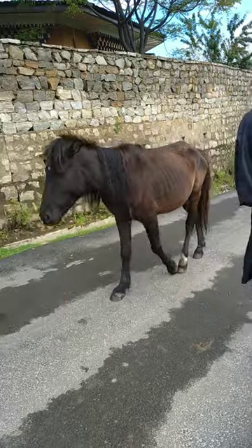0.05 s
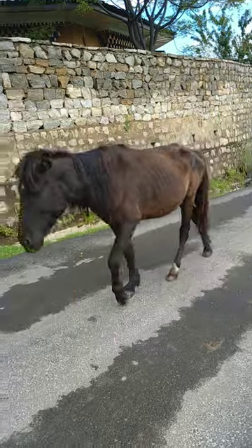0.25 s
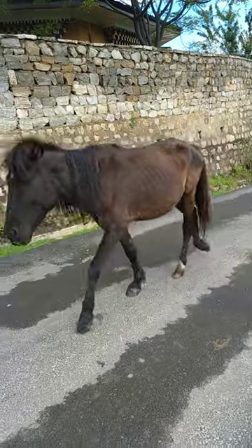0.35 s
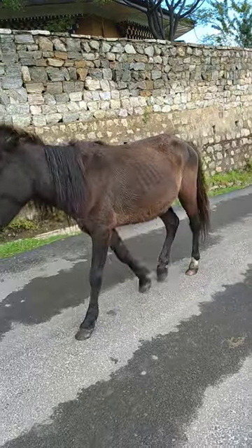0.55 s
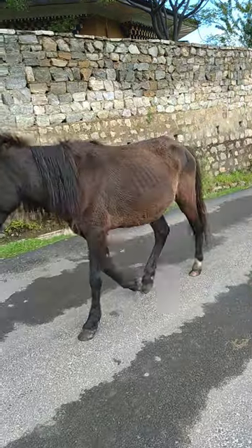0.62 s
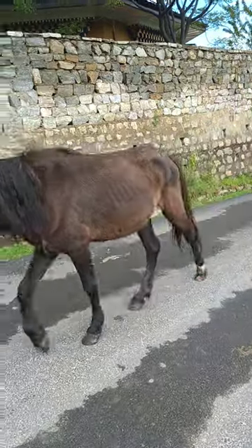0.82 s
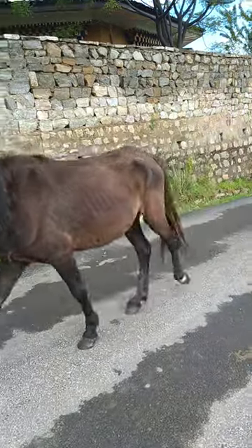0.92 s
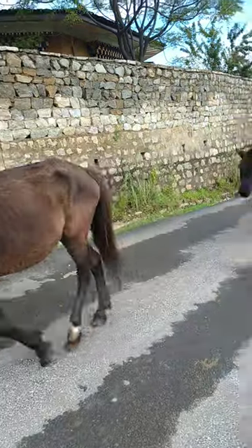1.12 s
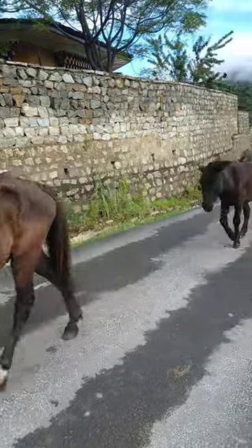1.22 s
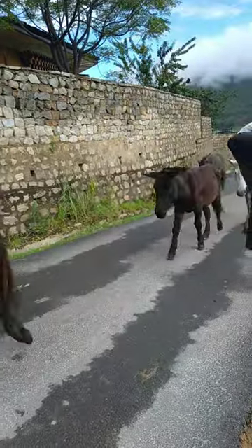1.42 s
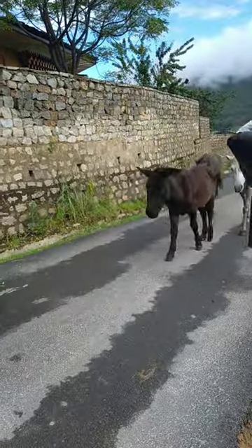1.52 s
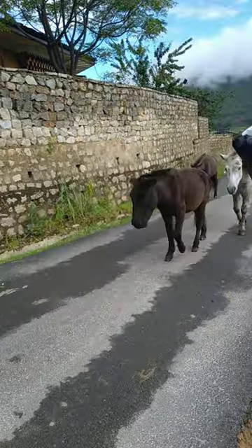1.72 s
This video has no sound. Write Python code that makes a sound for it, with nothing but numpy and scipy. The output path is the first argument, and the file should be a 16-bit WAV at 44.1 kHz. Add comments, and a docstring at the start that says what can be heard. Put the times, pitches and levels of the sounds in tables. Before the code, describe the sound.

Horse hooves clop dully on a paved road over a steady hiss of cicadas.

```python
"""A hissing cicada chorus fades in, with a far engine idling under a faint outdoor rumble.
One nearer insect pulses and dies away. Unshod horses walk past on a paved road beside a stone wall:
dull clops, a few scuffs on grit, a short echo. Later one cicada swells on the left.
The fade is the recorder's gain rising as it starts; its right channel gives one electrical pop."""
import sys
import numpy as np
from scipy import signal
from scipy.fft import rfft, irfft, next_fast_len
from scipy.io import wavfile
from scipy.ndimage import map_coordinates

SR = 44100
rng = np.random.default_rng(int(sys.argv[2]) if len(sys.argv) > 2 else 0)


def master(y):
    """Save y as 16-bit WAV."""
    cut = np.clip(np.atleast_2d(y).T, -1, 1)
    pcm = np.round(cut * 32767)  # scale
    wavfile.write(sys.argv[1], SR, pcm.astype(np.int16))


N = 77175
TIME_S = np.arange(N) / SR


def amp(db):
    """Decibels to gain."""
    return 10 ** (np.asarray(db) / 20)


def unit(x):
    """Scale to rms 1."""
    return x / np.sqrt(np.mean(x ** 2) + 1e-20)


def along(points, hz):
    """Interpolate (frequency [Hz], value) points on a log axis."""
    f, v = np.transpose(points)
    return np.interp(np.log(hz + 1), np.log(f + 1), v)


def level(points):
    """Gain per sample from (time [s], level [dB]) points."""
    return amp(np.interp(TIME_S, *np.transpose(points)))


def pan(db):
    """Stereo gains; positive dB is left."""
    return amp(np.array([[.5], [-.5]]) * db)


def bell(offset, width):
    """Gaussian of peak 1."""
    return np.exp(-.5 * (offset / width) ** 2)


def wobble(rate_hz):
    """Smooth random curve, rate_hz knots a second."""
    return map_coordinates(rng.standard_normal(int(N * rate_hz / SR) + 4), [TIME_S * rate_hz])


def filtered(x, response):
    """Apply a frequency response."""
    size = next_fast_len(N + SR // 4)
    return irfft(rfft(x, size) * response(np.fft.rfftfreq(size, 1 / SR)), size)[..., :N]


def noise(response):
    """Two independent coloured noises, joint rms 1."""
    return unit(filtered(rng.standard_normal((2, N)), response))


# Chorus spectrum (frequency [Hz], relative density [dB])
CHORUS_SPECTRUM = [(2300, -99), (2800, -16), (3400, -12.5), (3750, 2.5), (4100, 3), (4450, 0), (4850, -5),
                   (5400, -16.5), (7200, -19), (8500, -31.5), (15500, -37)]
# Chorus balance (frequency [Hz], pan [dB])
CHORUS_PAN = [(3000, 5), (4100, 0), (5500, 10.5), (7000, 12.5), (9000, -23.5), (14000, -16)]
# Chorus envelope (time [s], level [dB])
CHORUS_ENVELOPE = [(.3, -54.5), (.9, -53.5), (1.25, -52.5), (1.75, -52)]

def cicada_chorus():
    """Many far cicadas merge into a shimmering hiss around 4 kHz."""
    hiss = noise(lambda f: amp(along(CHORUS_SPECTRUM, f)) * pan(along(CHORUS_PAN, f)))
    shimmer_db = 0.83 * np.array([wobble(70.5), wobble(71)]) + 0.61 * wobble(8.26)
    return level(CHORUS_ENVELOPE) * amp(shimmer_db) * hiss


# Insect resonances (centre [Hz], width [Hz], relative level [dB], pan [dB])
INSECT_RESONANCES = [(3304, 160, 2, -1.5), (4440, 270, 0, -5), (7270, 510, -3, 5), (12100, 1800, -12, -4),
                     (14640, 740, -10, -1.5)]
# Insect envelope (time [s], level [dB])
INSECT_ENVELOPE = [(.1, -57), (.4, -56), (.72, -58), (.95, -64), (1.2, -72)]

def near_insect(pulse_hz=31.9, peak_s=.025, depth=.56):
    """Regular rasping pulses through the insect's resonances, dying away."""
    rasp = noise(lambda f: sum(amp(db) * pan(pan_db) * bell(f - hz, width_hz) / np.sqrt(width_hz)
                               for hz, width_hz, db, pan_db in INSECT_RESONANCES))
    pulses = 1 + depth * np.cos(2 * np.pi * pulse_hz * (TIME_S - peak_s))
    return level(INSECT_ENVELOPE) * unit(pulses) * rasp


# Engine orders (multiple of firing rate, base level [dB])
ENGINE_ORDERS = [(1, -57.5), (2, -55), (3, -64), (4, -59), (6, -65)]
# Hum envelope (time [s], gain [dB])
ENGINE_GAIN = [(.3, -2), (.5, 0.5), (.75, -6.5), (.95, -1.5), (1.15, -3), (1.3, -2), (1.48, -1),
               (1.56, -7.5), (1.75, -3.5)]

def engine(firing_hz=38.08, drift=0.0074, waver_db=1.5):
    """A far idling engine hums at slightly unsteady multiples of its firing rate."""
    cycles = np.cumsum(firing_hz * (1 + drift * wobble(6.27))) / SR
    hum = sum(amp(db + waver_db * wobble(4.94)) * np.sin(2 * np.pi * (order * cycles + rng.random()))
              for order, db in ENGINE_ORDERS)
    return np.sqrt(2) * level(ENGINE_GAIN) * hum * pan(db=2.5)


# Rumble spectrum (frequency [Hz], relative density [dB])
RUMBLE_SPECTRUM = [(20, 5.5), (50, -1), (100, -10.5), (180, -6), (350, -12.5), (700, -17), (1400, -21),
                   (2500, -28), (5000, -34), (15000, -48)]
# Left-right likeness (frequency [Hz], coherence [0..1])
RUMBLE_COHERENCE = [(200, 0.97), (400, 0.69), (700, 0.96), (1300, 0.23), (2500, 0.058)]
# Rumble envelope (time [s], level [dB])
RUMBLE_ENVELOPE = [(.3, -49), (.8, -50), (1.1, -50), (1.45, -49), (1.56, -50), (1.75, -47.5)]
# Extra bass envelope (time [s], gain [dB])
BASS_GAIN = [(.3, -1), (.8, 2), (1.0, 2), (1.2, 0), (1.48, -0.5), (1.58, -7.5), (1.75, -4)]

def outdoor_rumble(bass_hz=220):
    """Faint rumble, nearly mono in the bass, which dips near the end."""
    def mid_side(f):
        angle = np.arccos(along(RUMBLE_COHERENCE, f)) / 2
        return np.array([np.cos(angle), np.sin(angle)])

    mid, side = noise(lambda f: amp(along(RUMBLE_SPECTRUM, f)) * mid_side(f))
    rumble = unit(np.array([mid + side, mid - side]))
    bass = filtered(rumble, lambda f: 1 / (1 + (f / bass_hz) ** 4))
    return level(RUMBLE_ENVELOPE) * pan(db=2.5) * (rumble - bass + level(BASS_GAIN) * bass)


# Hoof contacts (time [s], level [dB], high-pass [Hz], low-pass [Hz], pan [dB])
HOOF_CONTACTS = [(0.1346, -39, 600, 1650, -2), (.2944, -35, 220, 1470, 6.5), (0.552, -42.5, 2500, 2190, 14),
                 (.6165, -31.5, 500, 1310, .5), (0.6171, -39.5, 500, 1230, 0), (.6191, -44, 400, 1140, -9),
                 (.7, -26, 380, 1750, 2), (0.7026, -39, 300, 1100, 9), (.967, -44, 600, 1560, 2),
                 (1.1032, -38.5, 282, 1480, 8), (1.153, -39, 504, 1720, -3), (1.2512, -37.5, 380, 1500, 5),
                 (1.3807, -35.5, 239, 1490, 8.5), (1.4876, -40, 250, 1400, 10), (1.4892, -43, 200, 990, 0),
                 (1.6418, -42, 490, 1620, 9), (1.745, -44, 300, 1000, 0)]
# Horn modes (frequency [Hz], relative level [dB], T60 [s])
HOOF_MODES = [(342, -17, 0.011), (800, 0, .012), (1400, -9, 0.011), (1700, -3, .02), (1850, 5, .033)]

def hooves(ring_db=-20.5, ring_attack_s=.0005, detune=.015):
    """Each contact is one dull pressure swing of about a millisecond, with a weak ring of the horn."""
    out = np.zeros((2, N))
    for start_s, db, low_hz, top_hz, pan_db in HOOF_CONTACTS:
        lowpass = lambda f: np.exp(-(f / top_hz) ** 5)
        impulse = signal.unit_impulse(N, round(start_s * SR))
        knock = filtered(impulse, lambda f: -1j * f ** 2 / (f ** 2 + low_hz ** 2) * lowpass(f))
        age_s = np.maximum(TIME_S - start_s, 0)
        ring = np.zeros(N)
        for hz, mode_db, t60_s in HOOF_MODES:
            decay = amp(mode_db + rng.normal(0, 2.4) - 60 * age_s / t60_s)
            cycles = hz * rng.normal(1, detune) * age_s + rng.random()
            ring += decay * lowpass(hz) ** .5 * np.sin(2 * np.pi * cycles)
        ring *= 1 - np.exp(-age_s / ring_attack_s)
        out += amp(db) * pan(pan_db) * (knock / abs(knock).max() + amp(ring_db) * ring)
    return out


# Hoof drags (time [s], decay [s], level [dB], centre [Hz])
HOOF_DRAGS = [(0.135, 0.023, -57, 1220), (0.288, 0.026, -59.5, 5530), (0.47, 0.0097, -55.5, 1680),
              (0.546, 0.0066, -49.5, 1850), (0.554, 0.015, -52.5, 2160), (0.573, 0.014, -50.5, 1850),
              (0.609, 0.079, -57.5, 1110), (0.728, 0.021, -55.5, 1790), (0.944, 0.022, -58, 1400),
              (1.154, 0.011, -52, 1170), (1.636, .025, -58.5, 1800), (1.673, 0.021, -56, 1080),
              (1.727, 0.021, -58, 590)]

def scuffs(rise_s=0.0038, log_width=0.25, roughness_db=2):
    """A hoof slides briefly over grit: a rough burst that dies away."""
    out = np.zeros((2, N))
    for start_s, decay_s, db, hz in HOOF_DRAGS:
        age_s = np.maximum(TIME_S - start_s, 0)
        stroke = (1 - np.exp(-age_s / rise_s)) * np.exp(-(age_s / decay_s) ** 2)
        mid, side = noise(lambda f: bell(np.log((f + 1) / hz), log_width))
        grit = unit(np.array([mid + .5 * side, mid - .5 * side]))
        out += amp(db - roughness_db * wobble(500)) * stroke * grit
    return out * pan(db=3.0)


def wall_echo(steps, gain_db=-14, rise_s=0.0053, t60_s=0.088):
    """The stone wall scatters the steps back as a short tail."""
    age_s = np.arange(SR // 4) / SR
    envelope = amp(-60 * age_s / t60_s) * (1 - np.exp(-age_s / rise_s))
    tail = rng.standard_normal((2, len(age_s))) * envelope
    return amp(gain_db) * signal.fftconvolve(steps, tail / np.linalg.norm(tail[0]), axes=1)[:, :N]


def electrical_pop(start_s=0.2143, gain_db=-7.5, swing_s=.049, settle_s=.07, edge_hz=2360, crack_db=-25):
    """An electrical step in the right channel swings through zero and settles."""
    age_s = np.maximum(TIME_S - start_s, 0)
    step = (age_s > 0) * (1 - age_s / swing_s) * np.exp(-age_s / settle_s)
    thump = signal.sosfilt(signal.butter(4, edge_hz, "low", fs=SR, output="sos"), step)
    return np.outer([0, 1], amp(gain_db) * (thump + amp(crack_db) * step))


# Solo cicada envelope (time [s], level [dB])
SOLO_ENVELOPE = [(.8, -61.5), (1.1, -58.5), (1.28, -54.5), (1.5, -60)]

def solo_cicada(centre_hz=4010, width_hz=190):
    """One cicada's narrow resonance swells out of the chorus on the left."""
    shrill = noise(lambda f: bell(f - centre_hz, width_hz))
    return level(SOLO_ENVELOPE) * pan(db=6) * shrill


def scene():
    """Horses by the wall, insects and the far background."""
    steps = hooves() + scuffs()
    horses = steps + wall_echo(steps)
    return horses + cicada_chorus() + solo_cicada() + near_insect() + engine() + outdoor_rumble()


FADE_START_S, FADE_S, STAIR_S, FADE_POWER = .0365, 0.29, .01, 0.85
OFFSET_DB, OFFSET_DECAY_S = -18.5, 0.1
BAND_LIMIT_HZ = 15800

def record(dry):
    """Gain climbs in small stairs over a settling input offset; one pop; a hard band limit."""
    stairs = np.ceil((TIME_S - FADE_START_S) / STAIR_S)
    fade = np.clip(stairs * STAIR_S / FADE_S, 0, 1) ** FADE_POWER
    offset = amp(OFFSET_DB) * np.exp(-TIME_S / OFFSET_DECAY_S)
    return filtered((dry + offset) * fade + electrical_pop(), lambda f: f < BAND_LIMIT_HZ)


dry = scene()
out = record(dry)
master(out)
```